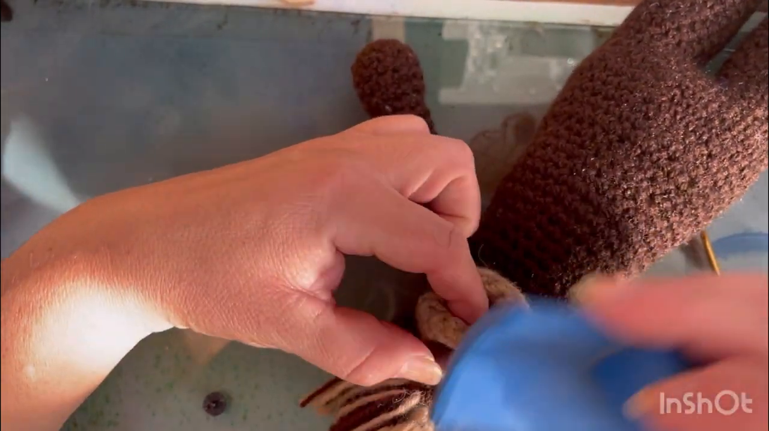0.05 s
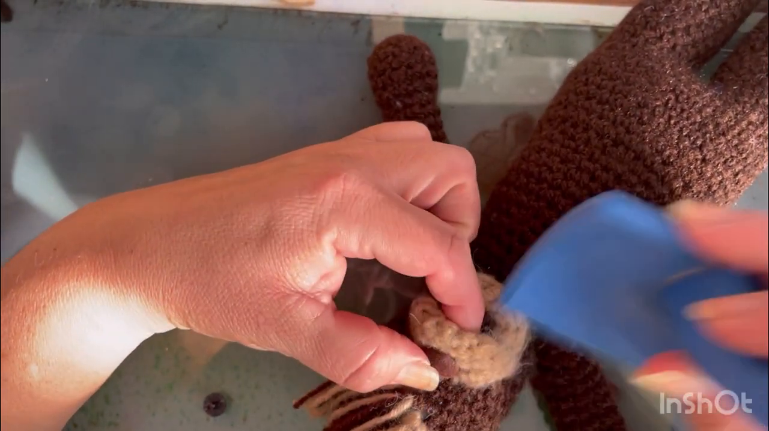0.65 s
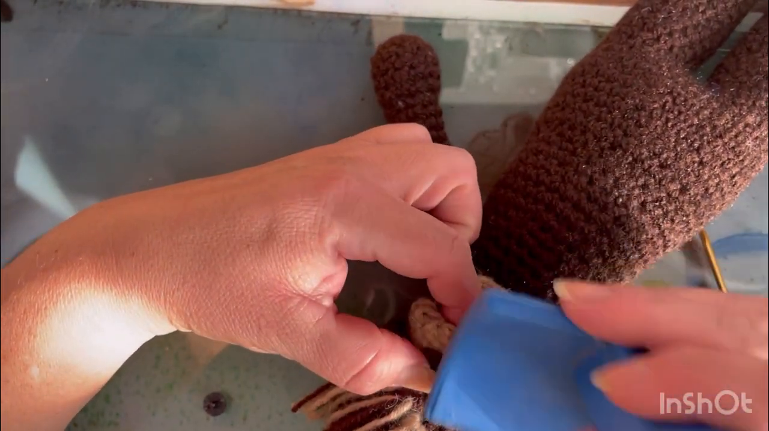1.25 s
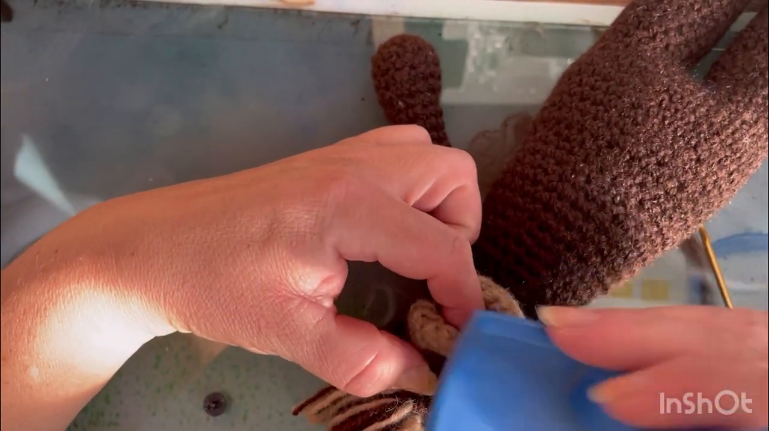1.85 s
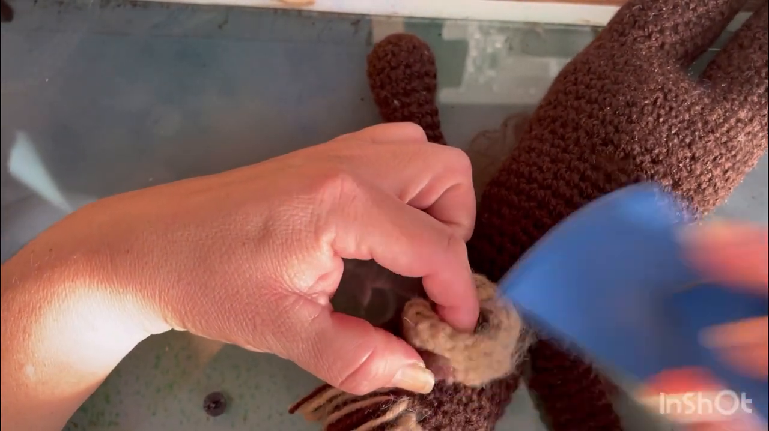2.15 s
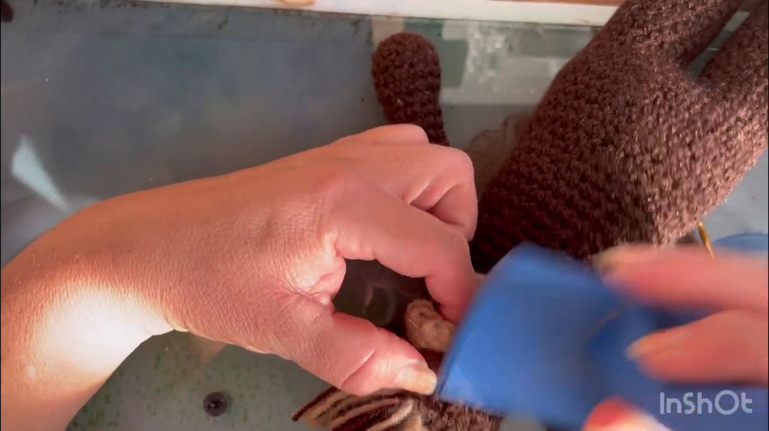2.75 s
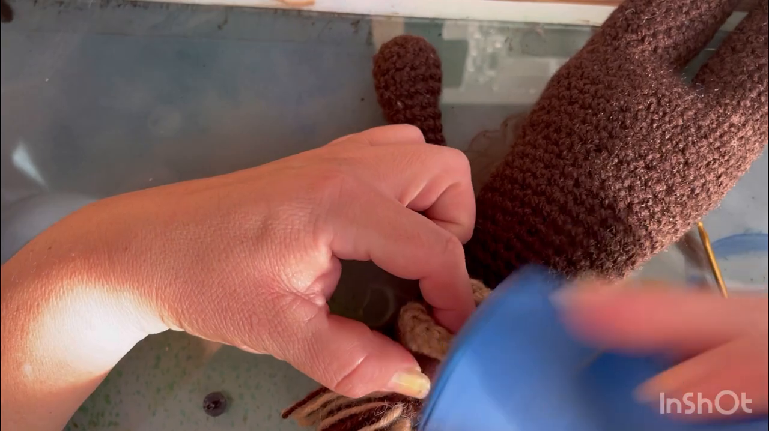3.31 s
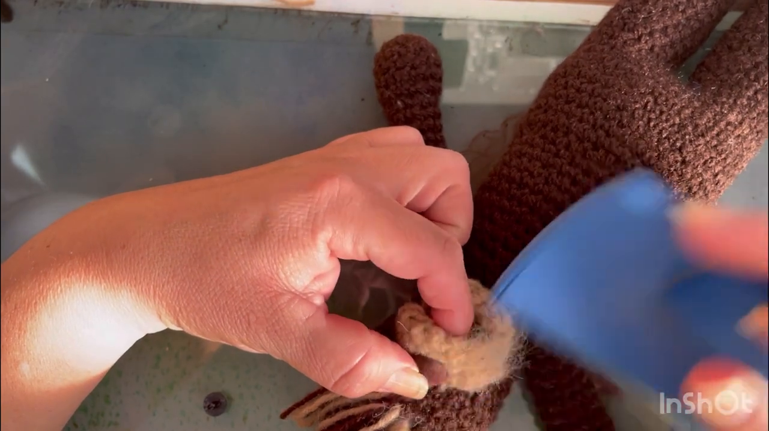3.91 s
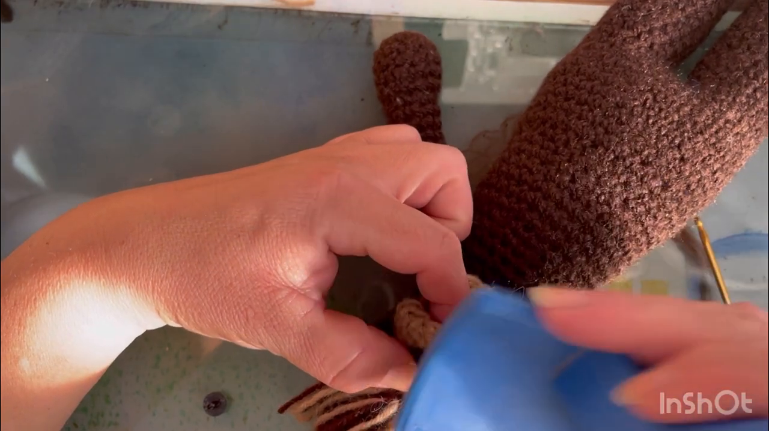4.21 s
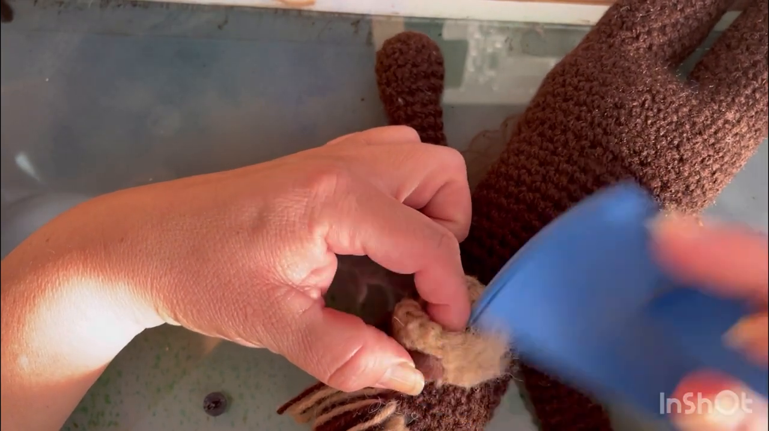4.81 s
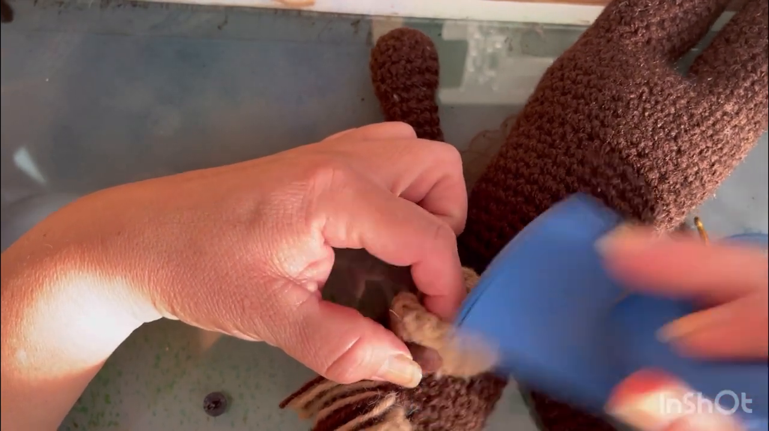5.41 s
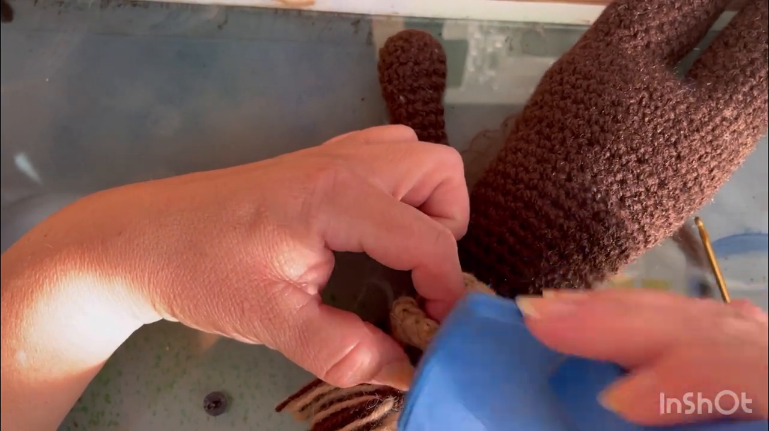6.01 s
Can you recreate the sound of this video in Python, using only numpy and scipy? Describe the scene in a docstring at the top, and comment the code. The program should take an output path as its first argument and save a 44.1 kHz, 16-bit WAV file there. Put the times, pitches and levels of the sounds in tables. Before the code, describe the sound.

Close to a phone microphone in a small room, a pet brush rasps through yarn in a quick, even rhythm. A faint hiss fades as the strokes begin. Each short scratch comes with crisp ticks of pins snagging fibres and a hollow note from the plastic head. The handle gives a soft knock midway and another later, while a quiet hum and a low rumble, briefly swelling midway, lie underneath.

```python
"""A faint hiss fades at the start; a mains hum and a low rumble run throughout in a small room.
From 0.15 s a plastic pet brush flicks through a crocheted toy's yarn hair, close to a phone, four or
five strokes a second. In each, a few pins tick as they land, then the whole pad tears through the
fibres and rings the hollow brush head; the room answers faintly.
The handle knocks softly at 3.1 s, the rumble swells around 3.6 s, the handle knocks again at 4.8 s."""
import sys
import numpy as np
from scipy import signal
from scipy.fft import rfft, irfft, next_fast_len
from scipy.io import wavfile
from scipy.ndimage import map_coordinates

SR = 44100
rng = np.random.default_rng(int(sys.argv[2]) if len(sys.argv) > 2 else 0)


def master(y):
    """Save y as 16-bit WAV."""
    cut = np.clip(np.atleast_2d(y).T, -1, 1)
    pcm = np.round(cut * 32767)  # scale
    wavfile.write(sys.argv[1], SR, pcm.astype(np.int16))


N = 271656


def amp(db):
    """Decibels to gain."""
    return 10 ** (np.asarray(db) / 20)


def unit(x):
    """Scale to rms 1."""
    return x / np.sqrt(np.mean(x ** 2) + 1e-20)


def along(points, hz):
    """Interpolate (frequency, value) points on a log axis."""
    freqs, values = np.transpose(points)
    return np.interp(np.log(hz + 1), np.log(freqs + 1), values)


def wobble(rate_hz, size):
    """Smooth random curve, rate_hz knots a second."""
    knots = rng.standard_normal(size // 20 + 8)
    return map_coordinates(knots, [np.arange(size) * rate_hz / SR], mode="mirror")


def filtered(x, response):
    """Apply a frequency response."""
    size = x.shape[-1]
    padded = next_fast_len(size + 2 ** 13)
    return irfft(rfft(x, padded) * response(np.fft.rfftfreq(padded, 1 / SR)), padded)[..., :size]


def ring(x, gain_db, size=2048):
    """Minimum-phase filter from a dB curve."""
    cepstrum = irfft(gain_db(np.fft.rfftfreq(size, 1 / SR)) * np.log(10) / 20)
    cepstrum[1:size // 2] *= 2
    cepstrum[size // 2 + 1:] = 0
    return signal.fftconvolve(x, irfft(np.exp(rfft(cepstrum))))[:len(x)]


def add(track, start_s, sound):
    """Mix a sound into a track from start_s on."""
    start = round(start_s * SR)
    sound = sound[..., max(-start, 0):max(N - start, 0)]
    track[..., max(start, 0):max(start, 0) + sound.shape[-1]] += sound


# diffuse field: (frequency [Hz], left-right coherence [0-1])
COHERENCE = [(60, 0.93), (130, 1), (300, 0.8), (600, 0.25), (950, 0), (1400, 0.68), (2000, 0.93),
             (3300, 0.05), (6000, 0.74), (9000, 1), (13000, 0.99)]
def diffuse(pair, spread=1):
    """Two independent signals to a diffuse stereo field; more spread, less coherence."""
    angle = lambda hz: np.arccos(np.clip(along(COHERENCE, hz), 0, 1) ** spread) / 2
    mid, side = filtered(pair, lambda hz: np.array([np.cos(angle(hz)), np.sin(angle(hz))]))
    return np.array([mid + side, mid - side])


def noise(spectrum, size=N):
    """Coloured diffuse stereo noise, rms 1."""
    white = diffuse(rng.standard_normal((2, size)))
    return unit(filtered(white, lambda hz: amp(along(spectrum, hz))))


# room air: (frequency [Hz], relative density [dB])
AIR_SPECTRUM = [(15, -2), (30, -10.5), (50, -3), (90, -2), (150, -8), (220, -7.5), (300, -14.5), (370, -12),
                (580, -17.5), (700, -11), (1250, -18), (1850, -24), (3300, -30.5), (4800, -42),
                (6500, -44.5), (11200, -44.5), (13500, -84)]
def air(level_db=-57):
    """Steady room noise."""
    return amp(level_db) * noise(AIR_SPECTRUM)


# mains partials: (frequency [Hz], rms level [dB])
HUM_PARTIALS = [(59.9, -66.5), (119.8, -61.5)]
def hum(waver_db=1, waver_rad=0.4):
    """Mains hum, wavering slightly in level and phase."""
    t = np.arange(N) / SR
    out = np.zeros(N)
    for hz, db in HUM_PARTIALS:
        peak = np.sqrt(2) * amp(db + waver_db * wobble(3.97, N))
        out += peak * np.sin(2 * np.pi * hz * t + waver_rad * wobble(3.29, N))
    return out


# rumble envelope: (time [s], relative level [dB])
RUMBLE_ENVELOPE = [(0, -63.5), (.3, -58), (.53, -51), (.75, -62), (2.3, -60.5), (2.68, -56.5),
                   (3.05, -59.5), (3.14, -50.5), (3.19, -63), (3.32, -58), (3.38, -46.5), (3.47, -50),
                   (3.63, -43.5), (3.74, -54.5), (3.83, -47), (3.91, -60.5), (5.4, -58), (5.87, -53.5)]
# rumble colour: (frequency [Hz], relative density [dB])
RUMBLE_SPECTRUM = [(15, -35), (25, -12.5), (36, -2.5), (55, 3), (90, -9), (150, -19.5), (400, -74)]
def rumble(gain_db=-1, lumps_db=0.5):
    """Low, lumpy noise that swells midway."""
    envelope_db = np.interp(np.arange(N) / SR, *np.transpose(RUMBLE_ENVELOPE))
    lumpy = unit(amp(lumps_db * wobble(14, N)) * noise(RUMBLE_SPECTRUM))
    return amp(envelope_db + gain_db) * lumpy


# hiss colour: (frequency [Hz], relative density [dB])
HISS_SPECTRUM = [(1200, -20), (1900, 9.5), (2150, 6), (2600, -17), (3300, -1), (3900, -29), (6000, -54)]
def hiss(level_db=-68, fade_s=0.54):
    """Faint narrow hiss that soon fades."""
    t = np.arange(N) / SR
    return amp(level_db) * np.exp(-(t / fade_s) ** 2) * noise(HISS_SPECTRUM)


# room decay: (frequency [Hz], t60 [s])
ROOM_DECAY = [(300, 0.5), (2000, 0.23), (7000, 0.2), (12000, 0.19)]
def room(x, level_db=-20.5, build_s=0.003, block=8192):
    """Wall reverberation; a new tail per block, as brush and hands move."""
    out = np.zeros((2, N))
    for start in range(0, N, block):
        hz, t, spectra = signal.stft(rng.standard_normal((2, SR // 3)), SR, nperseg=256)
        decay = amp(-60 * t / along(ROOM_DECAY, hz)[:, None])
        _, tail = signal.istft(spectra * decay, SR, nperseg=256)
        tail *= 1 - np.exp(-np.arange(tail.shape[1]) / SR / build_s)
        tail /= np.linalg.norm(tail[0])
        add(out, start / SR, signal.fftconvolve(x[None, start:start + block], tail, axes=1))
    return amp(level_db) * diffuse(out)


def reflected(x, echo_db=-9, t60_s=0.044, gap_s=0.0003):
    """Direct sound plus reflections off hands and desk, new for each sound and channel."""
    t = np.arange(SR // 20) / SR
    echoes = rng.standard_normal((2, len(t))) * amp(-60 * t / t60_s) * (t > gap_s)
    echoes = diffuse(echoes, spread=3)
    echoes /= np.linalg.norm(echoes[0])
    return x + amp(echo_db) * signal.fftconvolve(x[None], echoes, axes=1)[:, :len(x)]


# handle knocks: (time [s], relative level [dB])
HANDLE_KNOCKS = [(3.066, -53), (4.79, -58)]
# handle modes: (frequency [Hz], gain [dB], t60 [s])
HANDLE_MODES = [(710, 9.5, 0.027), (980, 13.5, 0.017), (1350, 1, .02), (1730, 11, 0.017)]
def knocks(attack_s=0.0014):
    """The handle shifts in the grip and rings briefly."""
    out = np.zeros((2, N))
    t = np.arange(SR // 20) / SR
    modes = sum(amp(db - 60 * t / t60_s) * np.sin(2 * np.pi * hz * t) for hz, db, t60_s in HANDLE_MODES)
    knock = modes * (1 - np.exp(-t / attack_s))
    for time_s, db in HANDLE_KNOCKS:
        add(out, time_s, amp(db) * reflected(knock))
    return out


def slips(rate_hz, spread_db, size):
    """Pin slips: randomly timed impulses of uneven strength."""
    happens = rng.random(size) < rate_hz / SR
    return happens * np.sign(rng.standard_normal(size)) * amp(spread_db * rng.standard_normal(size))


# one pin slipping off a fibre: (frequency [Hz], relative density [dB])
PIN_SPECTRUM = [(150, -27), (600, -14.5), (1200, -2.5), (2300, -1.5), (3700, 2), (5200, 4.5), (7000, 6.5),
                (8200, 4), (11000, 3.5), (12300, -9), (13500, -20.5), (15700, -24)]
# brush head resonances and one dip: (frequency [Hz], width [Hz], lift [dB])
HEAD_MODES = [(1530, 280, 0.5), (1847, 236, 13), (2827, 700, 9), (3815, 96, -3), (4640, 720, 7),
              (6920, 470, 1.5)]
def head(force, bright_db, pivot_hz=3800, patchy_db=1):
    """Pins ring the head: grip shifts its modes, faster slips are brighter, pin sets vary in colour."""
    grip = 1 + 0.03 * rng.standard_normal(len(HEAD_MODES))
    knots_hz = np.arange(0, SR / 2, 450)
    colour_db = patchy_db * rng.standard_normal(len(knots_hz))

    def gain_db(hz):
        modes_db = sum(db / (1 + (2 * (hz - centre_hz * shift) / width_hz) ** 2)
                       for (centre_hz, width_hz, db), shift in zip(HEAD_MODES, grip))
        tilt_db = bright_db / 2 * np.tanh(2 * np.log2((hz + 1) / pivot_hz))
        return along(PIN_SPECTRUM, hz) + modes_db + tilt_db + np.interp(hz, knots_hz, colour_db)
    return ring(force, gain_db)


def thrum(size, centre_hz=1820, width_hz=600):
    """The hollow head shaken at its main resonance, which moves a little with the grip."""
    peak_hz = centre_hz * (1 + 0.05 * rng.standard_normal())
    resonance = lambda hz: 1 / (1 + (2 * (hz - peak_hz) / width_hz) ** 2)
    return unit(filtered(rng.standard_normal(size), resonance))


def strays(gain_db=-52, rate_hz=16):
    """Fingers and loose fibres tick softly at random."""
    touches = np.clip(slips(rate_hz, spread_db=4, size=N), -1.5, 1.5)
    return amp(gain_db) * reflected(head(touches, bright_db=-12), echo_db=5)


def contacts(catch_t60_s, land_t60_s=0.048, scatter_s=0.0022, scatter_db=4):
    """Pins land, then catch, before each bite: (time [s], relative level [dB], tilt [dB], t60 [s])."""
    rows = []
    for middle_s, _, rise_s, _ in BRUSH_STROKES:
        land_s = middle_s - 0.0425 - 0.45 * rise_s + rng.normal(0, scatter_s)
        catch_s = middle_s - 2.4 * rise_s + rng.normal(0, scatter_s)
        rows.append((land_s, rng.normal(-51.5, scatter_db), -6.5, land_t60_s))
        rows.append((catch_s, rng.normal(-51, scatter_db), 2, catch_t60_s))
    return rows


# hard snags, a pin held and released: (time [s], relative level [dB], treble tilt [dB])
PIN_SNAGS = [(0.142, -39.5, 4), (0.381, -38.5, 13), (0.607, -44.5, -15), (1.069, -30, 6), (1.8845, -34, -5),
             (2.0768, -42.5, -10), (2.097, -32.5, -6), (2.486, -36, -6), (2.7383, -33, -10),
             (2.9471, -41, 4), (2.9898, -45, 8), (2.958, -33.5, 7), (3.1478, -36.5, 7), (3.3478, -42, -16),
             (3.376, -33.5, 18), (3.4355, -46, 15), (3.561, -44.5, -11), (3.5864, -39, -5),
             (3.807, -37, -8), (4.0105, -37, -14), (4.085, -43.5, 3.5), (4.2696, -36, 11),
             (4.6967, -32, 14), (4.9108, -29.5, 9), (5.143, -39.5, -4), (5.3511, -36.5, 14),
             (5.577, -39, -14), (5.8036, -36, 9), (5.828, -33.5, -16)]
def ticks(gain_db=-14.5, attack_s=0.001295, catch_t60_s=0.014, thrum_db=-8, thrum_t60_s=0.029):
    """A pin ticks with a slightly soft onset and chatters briefly; duller ticks shake the head more."""
    out = np.zeros((2, N))
    t = np.arange(-SR // 100, SR // 25) / SR
    burst = lambda t60_s: np.where(t < 0, np.exp(-np.abs(t) / attack_s), amp(-60 * np.abs(t) / t60_s))
    snags = [(*snag, catch_t60_s) for snag in PIN_SNAGS]
    for time_s, db, bright_db, t60_s in contacts(catch_t60_s) + snags:
        force = slips(rate_hz=8300, spread_db=7.8, size=len(t)) * burst(t60_s)
        chatter = unit(head(force, bright_db))
        shake = unit(burst(thrum_t60_s) * thrum(len(t))) * 2 / (1 + amp(bright_db))
        tick = reflected(chatter + amp(thrum_db) * shake)
        add(out, time_s + t[0] + attack_s, amp(db + gain_db) * tick)
    return out


def pressure(t, rise_s, fall_s):
    """Bell of force as the pad enters and leaves the yarn; peak at t = 0."""
    span_s = 1.23 * np.where(t < 0, max(rise_s, 0.004), max(fall_s, 0.004))
    steepness = np.where(t < 0, 2.32, 2.25)
    return np.exp(-np.abs(t / span_s) ** steepness)


def graze(t, level_db=-29, span_s=0.042):
    """Stray fibres graze the pins before and after the bite."""
    fibres = head(slips(rate_hz=1500, spread_db=5, size=len(t)), bright_db=-4)
    return amp(level_db) * np.exp(-(t / span_s) ** 4) * unit(fibres)


def snaps(t, rise_s, fall_s, gain_db=3, delay_s=0.0056):
    """Single fibres part with crisp clicks as the pad pulls free."""
    force = pressure(t - delay_s, rise_s, 0.56 * fall_s)
    return amp(gain_db) * head(force * slips(rate_hz=420, spread_db=4, size=len(t)), bright_db=12)


# dragging yarn: (frequency [Hz], relative density [dB])
YARN_SPECTRUM = [(80, -7.5), (250, -4.5), (480, -2), (600, -9.5), (725, 6), (850, -0.5), (1150, 3.5),
                 (1600, -13), (3000, -28.5)]
def drag(t, rise_s, fall_s, stroke_db, level_db=-46, typical_db=-33, delay_s=0.0055):
    """Strands drag softly just behind the bite, louder under a harder stroke."""
    gain = amp(level_db + 0.3 * (stroke_db - typical_db))
    return gain * pressure(t - delay_s, 0.95 * rise_s, 1.15 * fall_s) * noise(YARN_SPECTRUM, len(t))


# strokes: (middle time [s], relative level [dB], rise [s], treble tilt [dB])
BRUSH_STROKES = [(0.169, -38.5, 0.015, -3.5), (0.411, -36.5, 0.015, -5), (0.64, -33, 0.013, -1.5),
                 (0.851, -34, 0.01, -1.5), (1.076, -32.5, .012, 0), (1.282, -35.5, .008, -2.5),
                 (1.492, -35.5, .016, -4), (1.692, -32, .013, -4), (1.903, -33, 0.013, -3.5),
                 (2.103, -34.5, 0.011, -4), (2.304, -35.5, .012, -5.5), (2.51, -33.5, 0.015, -4.5),
                 (2.745, -30.5, .012, -5.5), (2.964, -32.5, 0.0067, 2.5), (3.185, -32, 0.016, -2),
                 (3.407, -32, .02, -3), (3.615, -35, 0.011, -1.5), (3.827, -34.5, .015, -7),
                 (4.052, -31.5, .023, -5), (4.282, -33, 0.014, -4), (4.5, -33, 0.017, -3.5),
                 (4.715, -30, .016, -1), (4.943, -31, 0.02, 1), (5.164, -30.5, 0.011, -2.5),
                 (5.39, -31.5, .019, -2.5), (5.605, -32.5, .014, 0), (5.842, -32, .016, -3),
                 (6.074, -31, 0.012, -2.5)]
def strokes(gain_db=-1, tilt_db=-0.7, clump_db=1.83, thrum_db=-9, thrum_lead_s=0.0043):
    """The pad tears through the yarn in a dense shower of slips; the head thrums as it bites."""
    out = np.zeros((2, N))
    t = np.arange(-SR // 10, SR // 10) / SR
    for middle_s, db, rise_s, bright_db in BRUSH_STROKES:
        fall_s = 0.013 * (rise_s / 0.014) ** 0.22  # slower in, slower out
        clumps = amp(clump_db * wobble(269.6, len(t)))  # rows of pins bite in clumps
        shower = slips(rate_hz=14000, spread_db=3, size=len(t))
        tearing = pressure(t, rise_s, fall_s) * unit(head(shower, bright_db + tilt_db))
        bite = pressure(t + thrum_lead_s, 0.82 * rise_s, 0.82 * fall_s)
        thrumming = amp(thrum_db) * bite * thrum(len(t))
        scratch = clumps * (tearing + thrumming) + graze(t) + snaps(t, rise_s, fall_s)
        add(out, middle_s + t[0], amp(db + gain_db) * reflected(scratch))
        add(out, middle_s + t[0], drag(t, rise_s, fall_s, db))
    return out


def scene():
    """The brush close by, its room and the background."""
    brush = strokes() + ticks() + knocks() + strays()
    return brush + room(brush.mean(axis=0)) + hum() + rumble() + air() + hiss()


# phone channels: (frequency [Hz], left phase lead [rad])
PHASE_LEAD = [(1500, 0), (2000, .3), (2600, .85), (3700, .55), (4400, 1.6), (4850, 3.14), (5300, 5.2),
              (5900, 6.28), (7500, 8), (9130, 9.42), (10500, 10.7), (12000, 12.5), (13700, 12.7),
              (15700, 15.2)]
def record(dry, top_hz=15600, edge_hz=90):
    """The phone's channels part in phase toward the treble; its band limit cuts the top."""
    phase = lambda hz: np.exp(0.5j * np.outer([1, -1], along(PHASE_LEAD, hz)))
    lowpass = lambda hz: 0.5 * (1 - np.tanh((hz - top_hz) / edge_hz))
    return filtered(dry, lambda hz: phase(hz) * lowpass(hz))


dry = scene()
out = record(dry)
master(out)
```